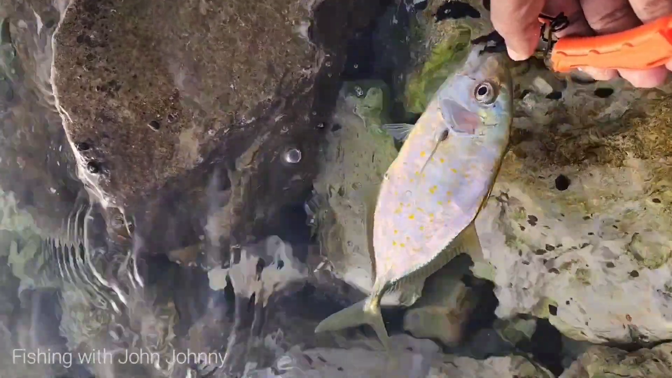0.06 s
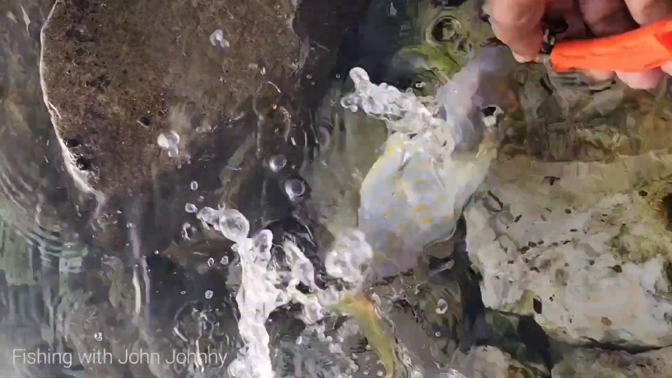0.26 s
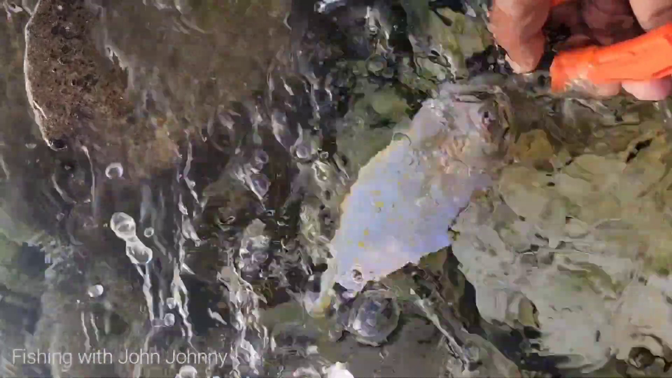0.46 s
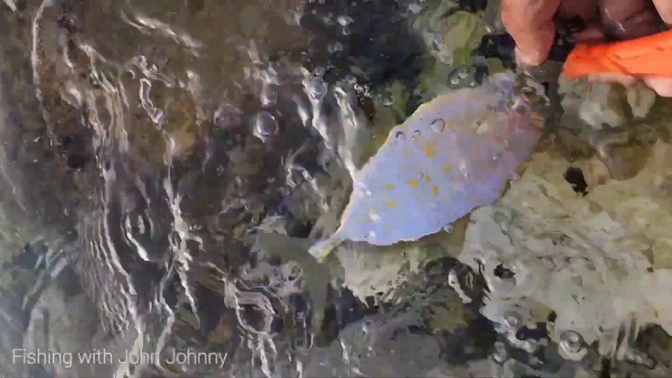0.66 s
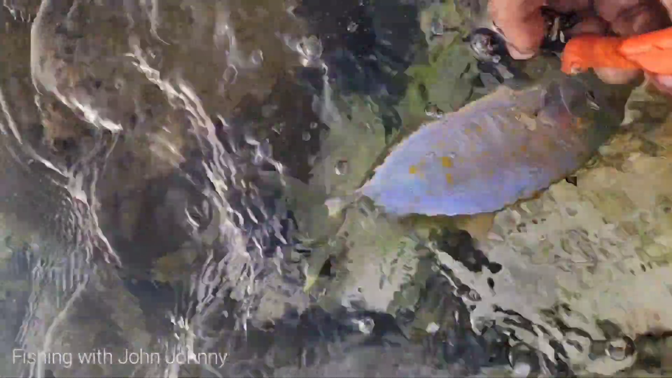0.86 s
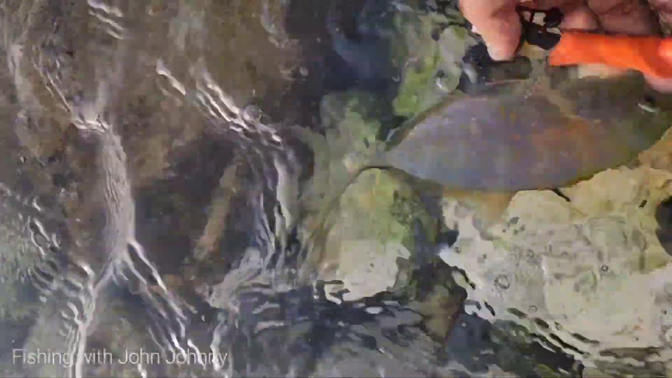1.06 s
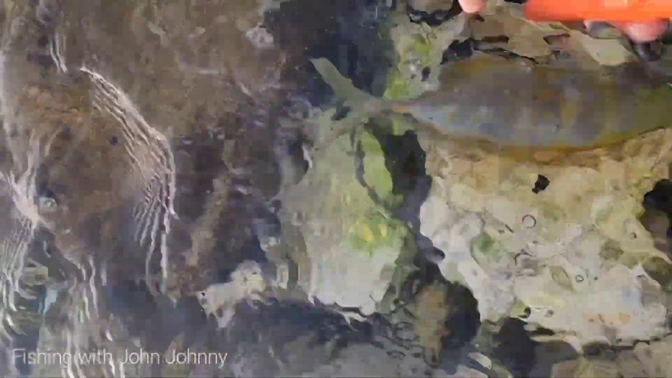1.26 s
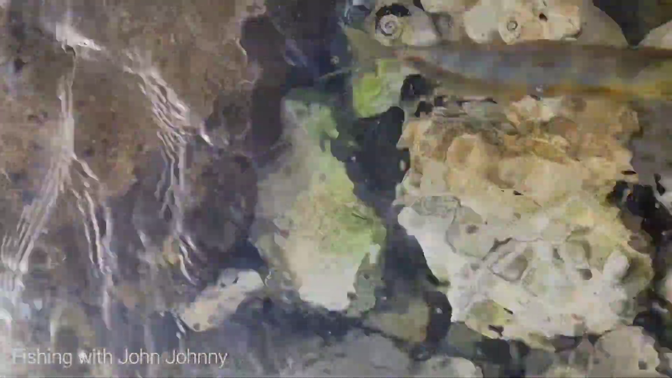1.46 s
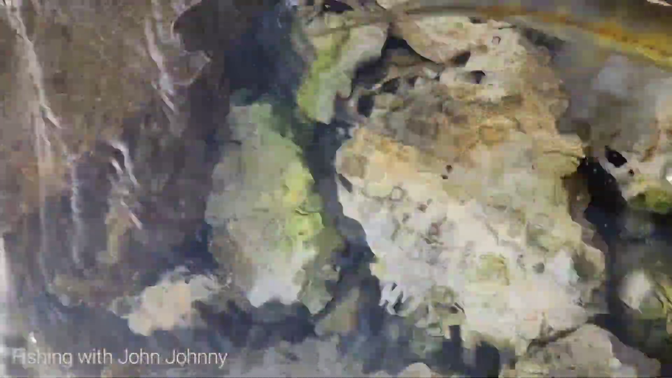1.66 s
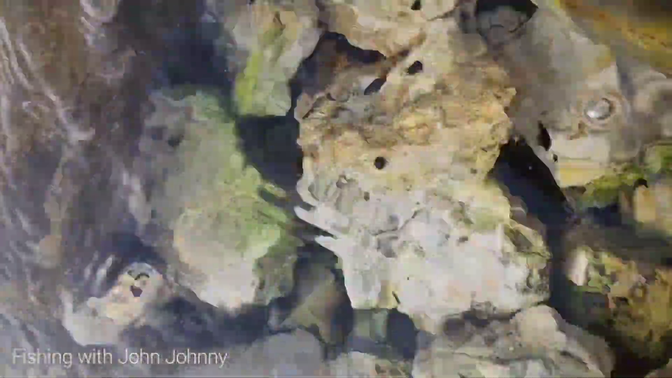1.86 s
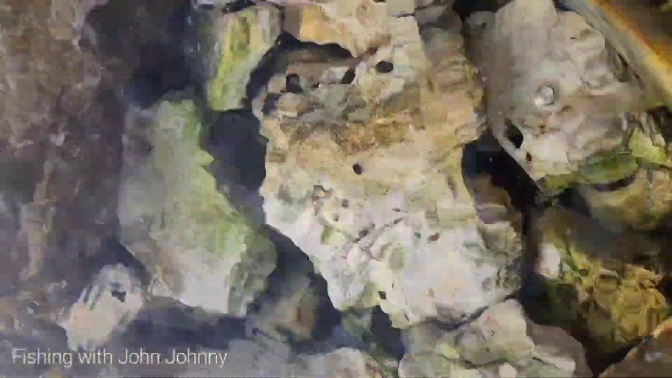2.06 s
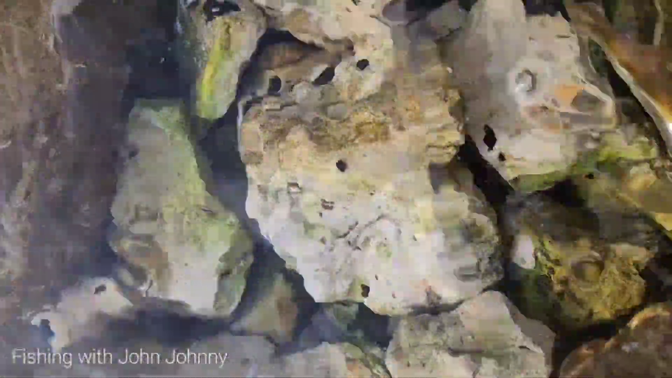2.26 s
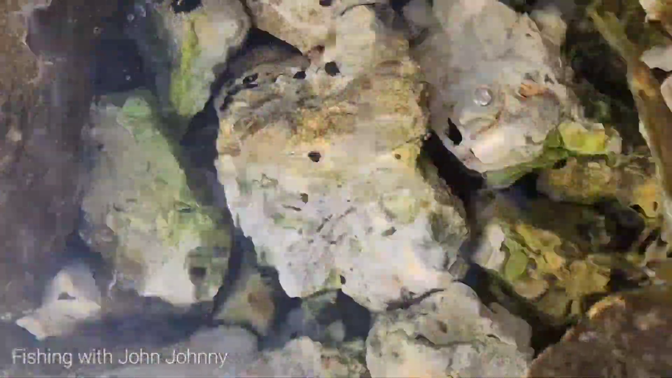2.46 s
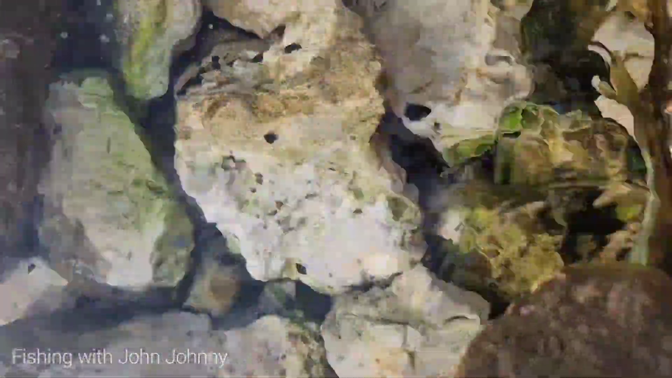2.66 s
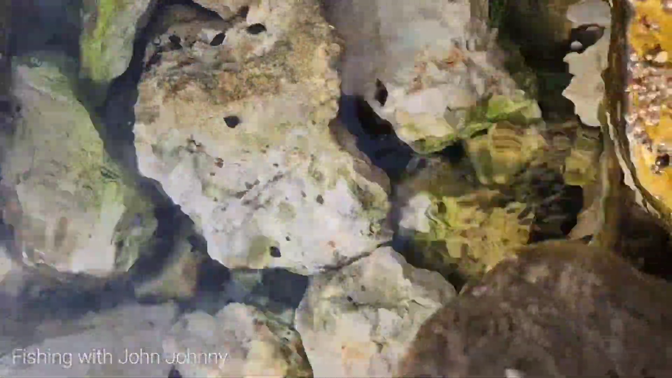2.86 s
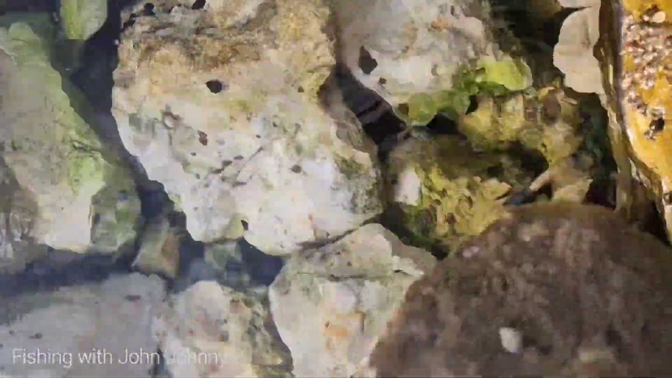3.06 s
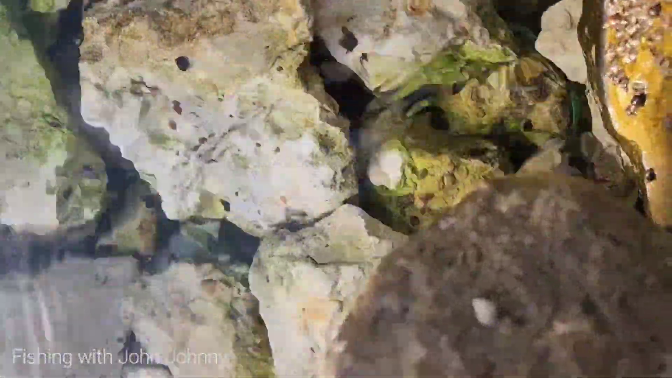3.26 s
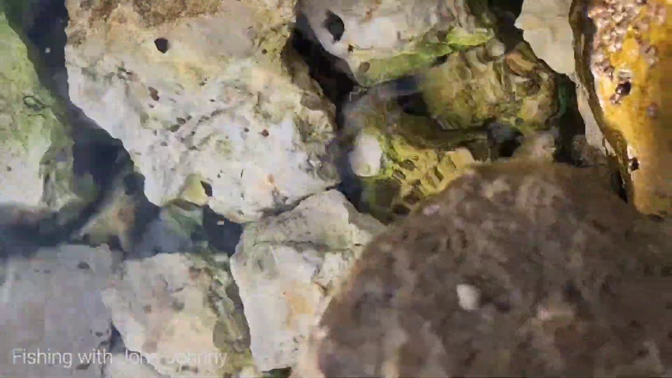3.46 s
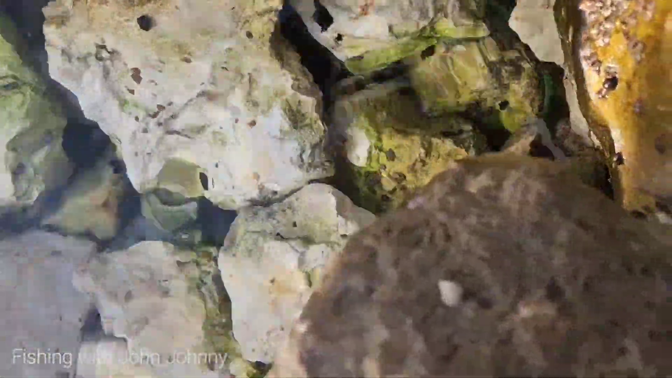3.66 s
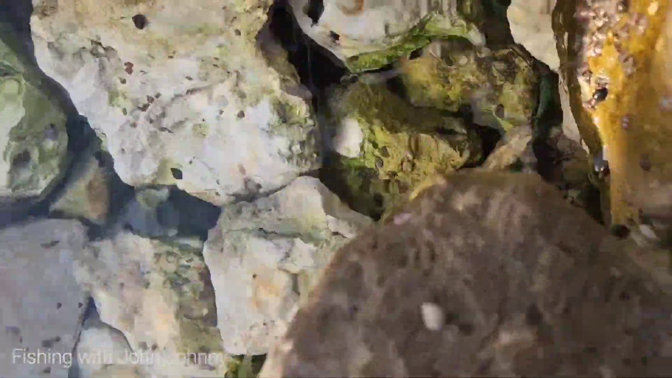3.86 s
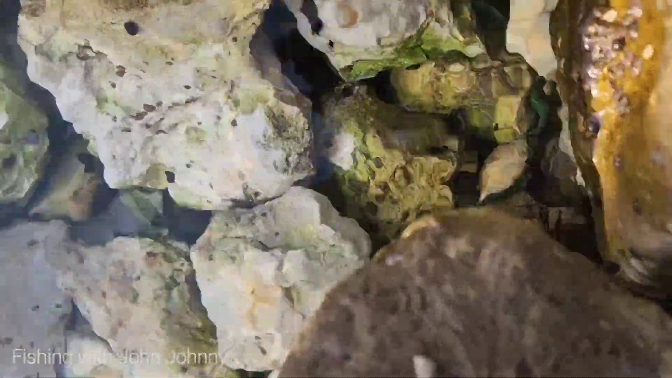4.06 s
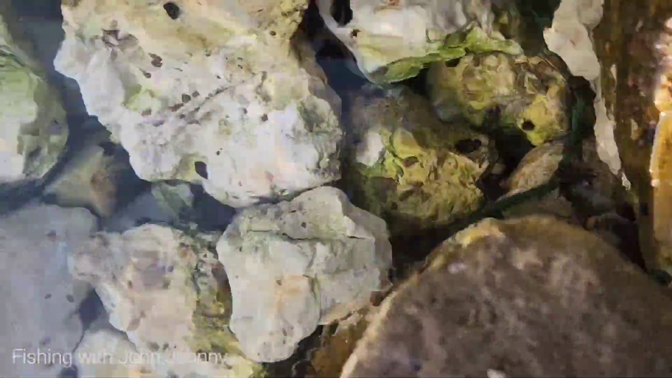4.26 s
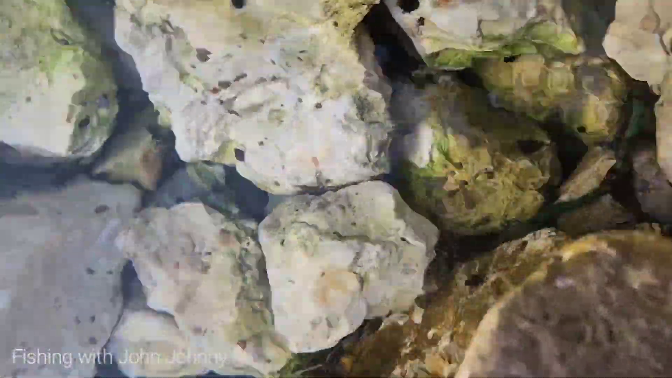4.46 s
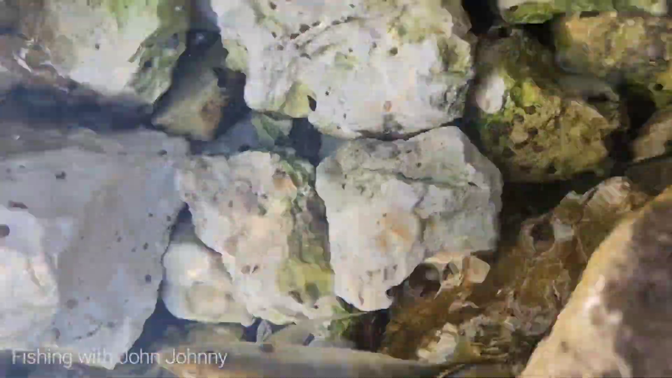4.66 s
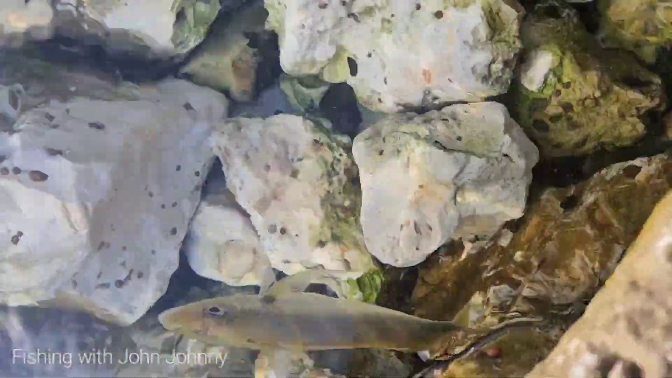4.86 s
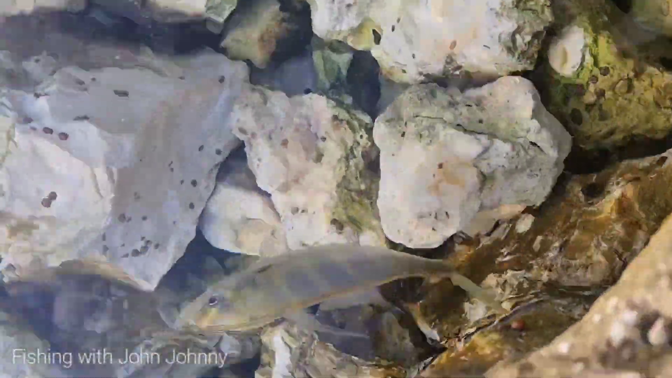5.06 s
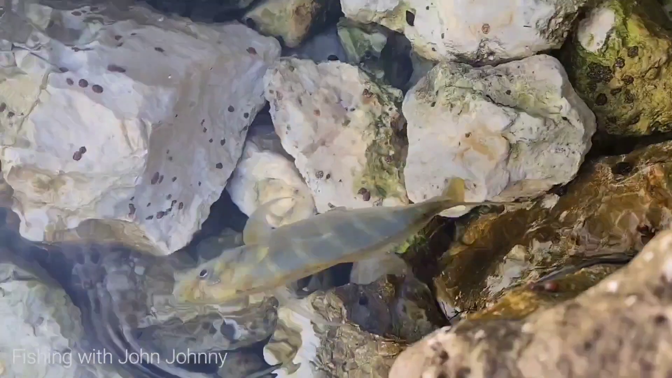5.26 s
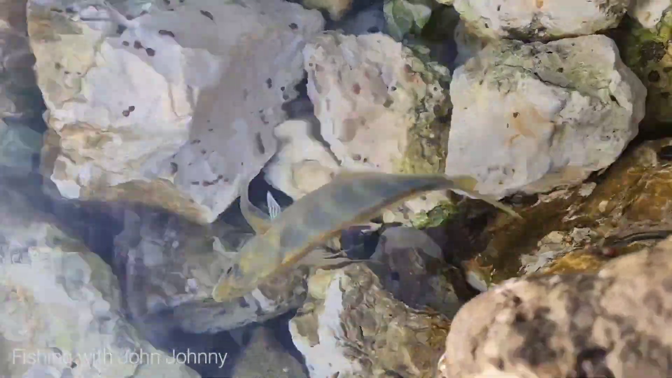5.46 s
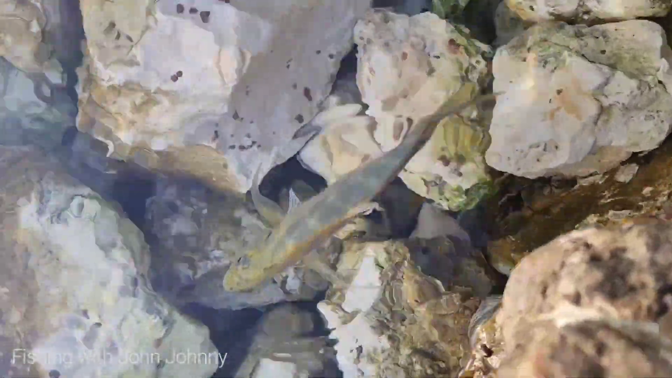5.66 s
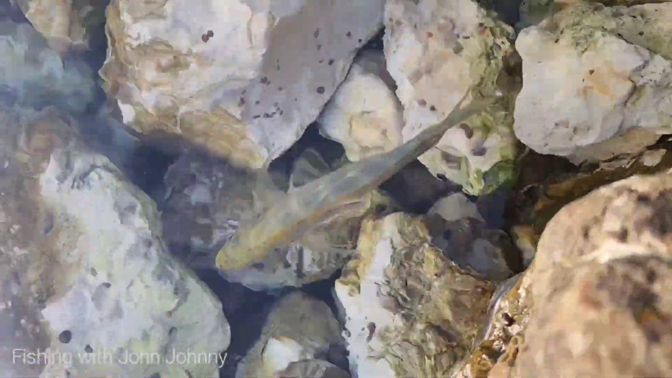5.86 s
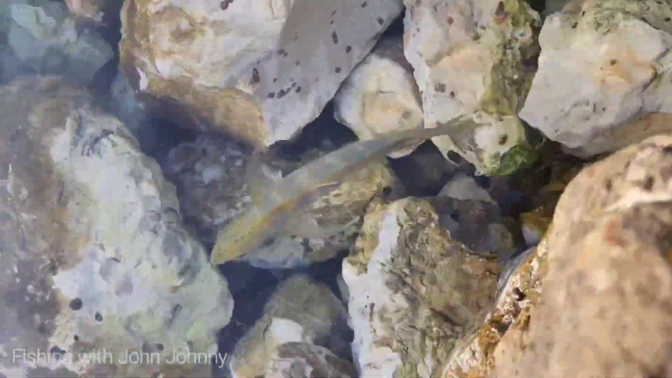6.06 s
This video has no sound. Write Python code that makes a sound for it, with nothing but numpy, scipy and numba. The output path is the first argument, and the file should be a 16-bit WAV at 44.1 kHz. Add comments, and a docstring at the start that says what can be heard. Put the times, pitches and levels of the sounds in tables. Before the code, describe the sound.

Light wind buffets the microphone as a fish thrashes once in shallow water, followed by pattering spray and small plops among stones.

```python
"""A light wind buffets the two microphone ports with a low, lumpy rumble over the faint wash of the shore.
A third of a second in, a fish thrashes in a rock pool: sheets of water tear into clouds of tiny bubbles,
big bubbles ring and drops smack down, all echoing briefly off the rocks. Spray hangs and patters back.
As the fish swims off, the drips thin out and the pool laps and fizzes, with stray plops among the stones
and one small glug near the end."""
import sys
import numpy as np
from numba import njit
from scipy import signal
from scipy.fft import rfft, irfft
from scipy.io import wavfile
from scipy.ndimage import uniform_filter1d

SR = 44100
rng = np.random.default_rng(int(sys.argv[2]) if len(sys.argv) > 2 else 0)


def to_wav(sig):
    """Store sig (one row per channel, or 1-D mono) as 16-bit WAV at the path in sys.argv[1].

    Samples outside -1..1 are clipped; the rate is SR.
    """
    pcm = np.clip(np.atleast_2d(sig), -1, 1) * 32767
    pcm = np.round(pcm).astype(np.int16)
    wavfile.write(sys.argv[1], SR, pcm.T)  # frames by channels


N = 270326
LEAD_S_PER_DB = 35e-6  # the louder port hears a panned sound earlier
SIDES = np.array([[1], [-1]])  # left, right


def amp(db):
    return 10 ** (np.asarray(db) / 20)


def unit_rms(x):
    return x / np.sqrt(np.mean(x ** 2) + 1e-20)


def automation(rows):
    """One curve per column, ramping between breakpoints timed by the first column."""
    times_s, *columns = np.transpose(rows)
    return [np.interp(np.arange(N) / SR, times_s, column) for column in columns]


def panned(pan_db):
    """Gains for the two ports; pan_db is always left minus right."""
    return amp(SIDES * pan_db / 2)


def add(mix, start_s, sound):
    part = mix[:, round(start_s * SR):][:, :sound.shape[1]]
    part += sound[:, :part.shape[1]]


def equalised(x, eq):
    """Minimum-phase EQ, so nothing rings before a hit; comes out at unit RMS."""
    hz, gain_db = np.transpose(eq)
    bin_hz = abs(np.fft.fftfreq(2 ** 14, 1 / SR))
    gain = amp(np.interp(np.log(bin_hz + 1), np.log(hz + 1), gain_db, -70, -70))
    response = np.exp(signal.hilbert(np.log(gain)).conj())
    taps = np.fft.ifft(response).real[:2 ** 13]
    return unit_rms(signal.oaconvolve(x, taps[None], axes=1)[:, :N])


@njit(fastmath=True)
def add_grains(out, onset, cycles_per_sample, length, gain):
    """Soft-edged sine blips, each chirping slightly upward; onset and length are in samples."""
    for k in range(len(onset)):
        for i in range(max(int(onset[k]) + 1, 0), min(int(onset[k] + length[k]), len(out))):
            age = i - onset[k]
            progress = age / length[k]
            turns = cycles_per_sample[k] * age * (1 + 0.095 * progress)
            out[i] += gain[k] * (progress * (1 - progress)) ** 2 * np.sin(2 * np.pi * turns)


def cloud(eq, per_s, cycles, spread_db, clump_db, pan_db, width_db, length_s=N / SR):
    """Tiny bubbles, a few cycles each, of random pitch, size and place, swelling in clumps."""
    eq_hz, eq_db = np.transpose(eq)
    when, pitch, size, place, span = rng.random((50000, 5))[:int(per_s * length_s)].T
    hz = eq_hz[0] * (eq_hz[-1] / eq_hz[0]) ** pitch
    onset = when * length_s * SR
    length = cycles * (.5 + span) * SR / hz
    # low, middle and high grains each get their own random swell
    clumps = unit_rms(uniform_filter1d(rng.standard_normal((3, N // 256 + 1)), size=9, axis=1))
    level_db = np.interp(np.log(hz), np.log(eq_hz), eq_db) - spread_db * np.log(size + 0.003)
    level_db += clump_db * clumps[(3 * pitch).astype(int), onset.astype(int) // 256]
    grain_pan_db = pan_db + width_db * (2 * place - 1)
    out = np.zeros((2, N))
    for port, side in zip(out, (1, -1)):
        side_db = side * grain_pan_db / 2
        add_grains(port, onset - LEAD_S_PER_DB * side_db * SR, hz / SR, length, amp(level_db + side_db))
    return unit_rms(out) * np.sqrt(length_s * SR / N)


# Tone of the distant wash: freq_hz, gain_db
SHORE_EQ = [(150, -37.5), (250, -3.5), (292, 0.5), (373, -20), (597, -14.5), (723, -23), (1330, -15),
            (1420, -14.5), (1610, -20), (2130, -14.5), (3280, -31), (4340, -28), (6820, -31), (8700, -27.5),
            (16000, -66.5)]


def shore(level_db=-69):
    """The far shore blurs into a steady bed of noise."""
    return amp(level_db) * equalised(rng.standard_normal((2, N)), SHORE_EQ) * panned(1.2)


def pushes(per_s, spread_db, channels):
    """Random pushes and pulls of air, as impulses of uneven size."""
    when, size, sign = rng.random((channels, 3000, 3))[:, :int(per_s * N / SR)].T
    pressure = np.sign(sign - .5) * amp(-spread_db * np.log(size + 0.0071))
    out = np.zeros((channels, N))
    np.put_along_axis(out, (when.T * N).astype(int), pressure.T, axis=1)
    return out


# Fader and pan ride of the wind: time_s, level_db, pan_db
WIND_RIDE = [(0.0, -45.5, 2), (0.33, -53, 3.5), (0.6, -51.5, 2), (0.75, -43.5, -10), (1.0, -51.5, 7),
             (1.15, -37.5, -8.5), (1.28, -45.5, -3), (1.45, -36, 1), (1.66, -52, -4), (2.07, -45.5, 2.5),
             (2.29, -53.5, 7.5), (2.45, -42.5, 8), (2.7, -43.5, 6), (2.86, -38.5, 7.5), (3.14, -40.5, 8.5),
             (3.26, -49, 4.5), (3.62, -35.5, 11), (3.72, -46.5, -1), (3.8, -41.5, 9), (4.05, -48, -2.5),
             (4.37, -47, 2), (4.51, -41.5, 9), (4.7, -52.5, 0), (5.13, -39, 6), (5.41, -44.5, 3.5),
             (5.61, -48.5, 2.5), (6.13, -52, 1)]
# Tone of an eddy through the microphone's bass cut: freq_hz, gain_db
RUMBLE_EQ = [(12, -36.5), (20, -8.5), (43, 7), (66, 5.5), (140, -10), (243, -24), (295, -32.5), (333, -29),
             (475, -56.5), (700, -44), (910, -74), (1540, -120)]


def wind(flutter_db=2.02, flutter_s=0.046):
    """Eddies push on the ports in uneven puffs; each push rings through the bass cut."""
    level_db, pan_db = automation(WIND_RIDE)
    window = int(flutter_s * SR)
    puffs = unit_rms(uniform_filter1d(uniform_filter1d(rng.standard_normal(N), window), window))
    brighter_eq = [(hz, db + 3 * np.log2(hz / 60)) for hz, db in RUMBLE_EQ]
    large = equalised(pushes(per_s=190, spread_db=3.5, channels=1), RUMBLE_EQ)  # cover both ports
    small = equalised(pushes(per_s=170, spread_db=2.5, channels=2), brighter_eq)
    return amp(level_db + flutter_db * puffs) * panned(pan_db) * (large + amp(-6.5) * small)


# The strongest eddies: start_s, level_db, pitch_hz, pan_db
WIND_THUMPS = [(0.13, -38, 119, -4), (0.206, -32, 49, 10), (0.223, -34.5, 101.4, 10),
               (1.351, -33, 92.7, -8.0), (2.04, -41.5, 150, 5), (2.59, -40.5, 156, 7),
               (3.009, -28.5, 96.2, 14.5), (3.117, -24, 56.4, 9), (3.323, -38, 66, 15),
               (3.573, -32.5, 101.4, 15), (4.379, -46, 87, 10.5), (5.026, -35.5, 93.2, 12.5),
               (5.106, -24.5, 70.2, 8), (5.212, -29, 76, -12)]


def wind_thumps():
    """A strong eddy lands as a low thump a few cycles long, sagging onto its pitch."""
    t = np.arange(SR // 8) / SR
    out = np.zeros((2, N))
    for start_s, level_db, pitch_hz, pan_db in WIND_THUMPS:
        hz = pitch_hz * (1 + 0.7 * np.exp(-t / 0.014))  # the bass cut lets the higher part out first
        envelope = (t * pitch_hz / 2.32) * np.exp(1 - t * pitch_hz / 0.99)
        thump = envelope * np.sin(2 * np.pi * np.cumsum(hz) / SR)
        add(out, start_s, amp(level_db) * panned(pan_db) * thump)
    return out


# Fader rides of the stirred water: time_s, lapping_db, fizz_db
POOL_RIDE = [(0.0, -66, -76.5), (0.28, -67.5, -75), (0.4, -56, -73), (1.11, -58.5, -66.5),
             (1.38, -55.5, -67), (1.63, -63, -70), (2.03, -64.5, -68), (2.22, -70.5, -82.5),
             (2.37, -59, -73), (2.62, -63, -74.5), (2.84, -64.5, -69), (3.25, -69, -74), (3.5, -71.5, -71),
             (4.05, -63, -73.5), (4.21, -55, -72.5), (4.36, -70, -71), (4.6, -64.5, -72.5),
             (4.95, -71, -77.5), (5.2, -68.5, -81), (5.45, -70, -80), (5.57, -68.5, -72.5),
             (5.75, -72, -78), (6.13, -70.5, -84)]
# Tone of the gurgle between the stones: freq_hz, gain_db
LAPPING_EQ = [(220, -4.5), (350, -4.5), (700, -5), (1400, -4), (2500, -6), (4000, -12.5)]
# Tone of the spray, fizz below and mist on top: freq_hz, gain_db
SPRAY_EQ = [(2500, -7), (3500, -4.5), (5000, -4.5), (7500, 6), (9500, -11), (13000, -2.5), (16000, -2.5)]


def pool(hang_db=12.5, hang_until_s=1.2, settle_s=0.31):
    """Stirred water laps and fizzes; the finest spray follows the fizz and hangs on after the splash."""
    lapping = cloud(LAPPING_EQ, per_s=1000, cycles=5.5,
                    spread_db=2.5, clump_db=2.5, pan_db=0.26, width_db=12)
    blips = cloud(LAPPING_EQ[1:5], per_s=63, cycles=13,
                  spread_db=2, clump_db=5, pan_db=1.5, width_db=8.5)
    fizz = cloud(SPRAY_EQ[:5], per_s=8000, cycles=8, spread_db=2, clump_db=2.2, pan_db=2.5, width_db=12)
    plinks = cloud(SPRAY_EQ[:4], per_s=24, cycles=22, spread_db=2, clump_db=3, pan_db=2, width_db=11)
    mist = cloud(SPRAY_EQ[4:], per_s=5100, cycles=11, spread_db=3.5, clump_db=3.5, pan_db=3, width_db=11)
    lapping_db, fizz_db = automation(POOL_RIDE)
    t = np.arange(N) / SR
    splash_s = SPLASH_SHEETS[0][0]
    hanging = (t > splash_s) * np.exp(-np.maximum(t - hang_until_s, 0) / settle_s)
    mist_db = -82 + 0.9 * (fizz_db + 72) + hang_db * hanging
    return (amp(lapping_db) * (lapping + amp(-8.5) * blips)
            + amp(fizz_db) * (fizz + amp(-12) * plinks)
            + amp(mist_db) * mist)


def rock_echoes(x, t60_s=0.072):
    """The rocks around the pool throw each sound back as a short scatter of echoes."""
    t = np.arange(SR // 8) / SR
    taps = rng.standard_normal((2, len(t))) * (rng.random((2, len(t))) < .06)
    taps *= amp(-60 * t / t60_s) * (t > .002)  # decay and pre-delay
    taps /= np.linalg.norm(taps, axis=1, keepdims=True)
    return signal.oaconvolve(x, taps, axes=1)[:, :N]


# Air leaving a gap in the stones: start_s, length_s, level_db, first_hz, late_hz, last_hz
AIR_POCKET = (5.112, 0.06, -57, 290, 700, 1500)


def glug():
    """The air pocket shrinks: its pitch creeps up, then shoots up as it closes."""
    start_s, length_s, level_db, first_hz, late_hz, last_hz = AIR_POCKET
    progress = np.arange(int(length_s * SR)) / (length_s * SR)
    hz = first_hz + (late_hz - first_hz) * progress + (last_hz - late_hz) * progress ** 6
    chirp = np.sin(np.pi * progress) * np.sin(2 * np.pi * np.cumsum(hz) / SR)
    out = np.zeros((2, N))
    add(out, start_s, amp(level_db) * panned(0) * chirp)
    return out


def drip_hits(count=80, from_s=0.72, thin_s=1.5, drain_s=0.74, low_hz=3460, high_hz=12960):
    """Cues for small drops running off: sparser, softer and duller as the stones drain."""
    when, size, pitch, place = rng.random((count, 4)).T
    delay_s = np.minimum(-thin_s * np.log(when + 1e-3), 5)
    level_db = -52 - 8 * np.minimum(delay_s / drain_s, 1) + 4 * (2 * size - 1)
    dulling_octaves = 0.14 * delay_s
    centre_hz = low_hz * (high_hz / low_hz) ** pitch / 2 ** dulling_octaves
    pan_db = 5 + 10 * (2 * place - 1)
    return list(zip(from_s + delay_s, level_db, centre_hz, pan_db))


# The loudest drops of falling spray: hit_s, level_db, centre_hz, pan_db
DROP_HITS = [(0.3854, -18.5, 3130, -6.5), (0.3954, -14.5, 2400, 0.5), (0.4315, -29, 7000, 3),
             (0.4529, -23.5, 5530, 7), (0.4618, -23, 2250, -2.5), (0.4882, -29.5, 3500, 5.5),
             (0.547, -38, 4240, -7.5), (0.555, -25.5, 8500, 4.5), (0.616, -29.5, 1940, 3.5),
             (0.637, -35, 8000, 8.5), (0.644, -33, 8300, 8), (0.6782, -37, 6700, 11),
             (0.699, -26, 5460, 3.5), (0.7016, -25.5, 11100, 6.5), (0.71, -34.5, 9500, -4.5),
             (0.7243, -36, 5300, 4.5), (0.763, -41, 5900, 3.5), (0.7886, -31.5, 12700, 10),
             (0.8404, -41, 3100, 3.5), (0.938, -47, 6500, 5.5), (1.0742, -30.5, 5370, 5),
             (1.1344, -35.5, 4960, -2), (1.3692, -46, 2950, 9.5), (1.399, -44.5, 4000, 8),
             (1.84, -46, 2464, -2.5), (2.3108, -55.5, 4250, 15.5), (2.4013, -49, 1960, 18),
             (2.698, -53, 9900, 9), (2.7232, -48.5, 11000, -3), (2.7766, -54.5, 4100, -14),
             (2.8067, -43, 2194, 7.5), (3.7874, -49, 2670, 9), (3.8367, -50, 2520, -3),
             (4.1145, -51.5, 6380, -8.5), (4.2134, -49.5, 2180, -2), (4.2676, -43.5, 1900, 4),
             (4.401, -54, 2590, 14.5), (4.617, -48, 2080, 6.5), (5.2162, -51.5, 1990, 12.5),
             (5.3917, -52, 4150, 9), (5.4734, -48, 1590, 2.5), (5.575, -50.5, 1750, 9.5)]


def drops(trim_db=-5.5, low_cut_hz=1000, samples=1536):
    """A drop's tick: a soft-edged snap of band noise with a brief fading tail and no bass."""
    hz = np.fft.rfftfreq(samples, 1 / SR) + 1
    from_peak_ms = np.arange(samples) / SR * 1000 - 8
    snap = amp(60 * np.minimum(from_peak_ms / 7.6, -from_peak_ms / 5.9))
    tail = amp(-15.5 + 60 * np.minimum(from_peak_ms / 18, -from_peak_ms / 40))
    low_cut = 1 / (1 + (low_cut_hz / hz) ** 4)  # a drop is too small to push out bass
    out = np.zeros((2, N))
    for hit_s, level_db, centre_hz, pan_db in DROP_HITS + drip_hits():
        noise = rng.standard_normal((3, samples))
        stereo_noise = 0.23 * noise[:2] + noise[2]  # mostly shared by the two ports
        width_octaves = max(0.45 + 0.1 * (level_db + 50), .15)  # heavier drops are broader
        band = np.exp(-(np.log2(hz / centre_hz) / width_octaves) ** 2 / 4) / np.sqrt(hz / centre_hz)
        lead = np.exp(1j * np.pi * hz * LEAD_S_PER_DB * pan_db * SIDES)
        burst = unit_rms(irfft(rfft(stereo_noise) * band * low_cut * lead))
        add(out, hit_s - .0075, amp(level_db + trim_db) * panned(pan_db) * burst * (snap + tail))
    return out


# Single plops of trapped air: start_s, level_db, pitch_hz, t60_ms, pan_db
BUBBLE_PLOPS = [(0.3323, -28, 3750, 12, -6.5), (0.3642, -20.5, 2110, 3.2, 9.5), (0.3686, -24, 2870, 13, -2),
                (0.383, -29, 2740, 3, -3), (0.386, -7.5, 1600, 3, 1.5), (0.4036, -37, 3150, 5, -12),
                (0.4421, -20, 1213, 11, 15.5), (0.4463, -24.5, 1575, 24, -1.5),
                (0.457, -25.5, 1116, 15, 5.5), (0.4803, -22, 1140, 18, 9.5), (0.5042, -33.5, 1370, 11, 16),
                (0.5616, -38.5, 2135, 27, 20), (0.615, -27.5, 1470, 19, 2.5),
                (0.6245, -39.5, 1190, 25, 16.5), (0.7253, -38, 1172, 77, 6), (0.7347, -29.5, 1245, 6.7, 9),
                (0.739, -42.5, 396, 63, -2), (0.7633, -45, 2210, 7, -11), (0.795, -56, 1320, 26, 23),
                (0.9606, -47.5, 3690, 20, 9), (1.073, -40, 1410, 28, -11.5), (1.1291, -33, 1520, 6.5, -8.5),
                (1.2717, -46, 590, 62, -1), (1.3675, -51.5, 2320, 30, 12), (1.7132, -43.5, 710, 21, -9),
                (2.5309, -55.5, 1050, 86, 21), (2.7215, -49.5, 763, 28, 9), (3.55, -48.5, 344, 115, -10.5),
                (3.695, -54.5, 2690, 14, 7.5), (3.8446, -40, 374, 51, -5.5), (4.0261, -50.5, 445, 52, -7),
                (4.1556, -30.5, 782, 25, -6), (4.1988, -41, 457, 21, -4), (4.2137, -48, 1480, 41, -6.5),
                (4.231, -49.5, 840, 35, -6), (4.6156, -51.5, 817, 20, -10), (4.7569, -47, 1470, 34, 5),
                (4.975, -54, 411, 60, 0), (5.2146, -50.5, 1960, 32, 1.5), (5.5726, -54.5, 945, 39, 4)]


def bubbles(attack_cycles=3, climb_per_t60=0.048):
    """Each bubble swells in a few cycles and rings out; its pitch climbs as it nears the surface."""
    t = np.arange(SR // 8) / SR
    out = np.zeros((2, N))
    for start_s, level_db, pitch_hz, t60_ms, pan_db in BUBBLE_PLOPS:
        age_ms = 1000 * (t + LEAD_S_PER_DB / 2 * pan_db * SIDES)
        attack_ms = 1000 * attack_cycles / pitch_hz
        attack = np.sin(np.pi / 2 * np.clip(age_ms / attack_ms, 0, 1)) ** 2
        decay = amp(-60 * np.maximum(age_ms - attack_ms, 0) / t60_ms)
        turns = pitch_hz * age_ms / 1000 * (1 + climb_per_t60 * age_ms / t60_ms / 2)
        add(out, start_s, amp(level_db) * panned(pan_db) * attack * decay * np.sin(2 * np.pi * turns))
    return out


# Sheets of water thrown up by the fish: peak_s, body_db, treble_db
SPLASH_SHEETS = [(0.363, -32.5, -36), (0.388, -25.5, -34), (0.447, -38, -49), (0.488, -43, -42),
                 (0.519, -38, -46.5), (0.535, -50, -57), (0.556, -39.5, -38), (0.578, -62, -68),
                 (0.614, -53, -56), (0.64, -61, -61), (0.698, -41, -43), (0.722, -45, -56),
                 (0.752, -55, -62), (0.795, -63, -68)]
# Tone of tearing water: freq_hz, gain_db
SPLASH_EQ = [(950, -14.5), (1500, -5), (3000, -3.5), (5500, -3.5), (7500, -7), (10000, -12.5),
             (13000, -6.5), (16000, -6)]


def splash(rise_db_per_s=1400.5, fall_db_per_s=900, spatter_fall_db_per_s=220):
    """Sheets of water tear in turn: each is a surge of dense grains with a softer spatter as its tail."""
    t = np.arange(SR) / SR
    envelopes = np.zeros((2, N))  # body, treble
    for peak_s, body_db, treble_db in SPLASH_SHEETS:
        rise_db = rise_db_per_s * (t - peak_s)
        tear = amp(np.minimum(rise_db, fall_db_per_s * (peak_s - t)))
        spatter = amp(-19 + np.minimum(rise_db, spatter_fall_db_per_s * (peak_s - t)))
        envelopes[:, :SR] += amp([[body_db], [treble_db]]) * (tear + spatter)
    body = cloud(SPLASH_EQ[:4], per_s=18000, cycles=7.56,
                 spread_db=3.5, clump_db=8.5, pan_db=2, width_db=5, length_s=0.97)
    treble = cloud(SPLASH_EQ[3:], per_s=30000, cycles=7.2,
                   spread_db=5.3, clump_db=3.5, pan_db=3.5, width_db=9.5, length_s=1)
    return envelopes[0] * body + envelopes[1] * treble


def scene():
    """Close water sounds over a bed of wind, shore and pool; only the close ones echo."""
    close = splash() + bubbles() + glug() + drops()
    bed = wind() + wind_thumps() + shore() + pool()
    return bed + close + amp(-10.5) * rock_echoes(close)


def record(dry):
    """A steep high cut takes off the very top."""
    high_cut = signal.firwin(511, 16050, window=("kaiser", 9), fs=SR)
    return signal.oaconvolve(dry, high_cut[None], "same")


dry = scene()
out = record(dry)
to_wav(out)
```